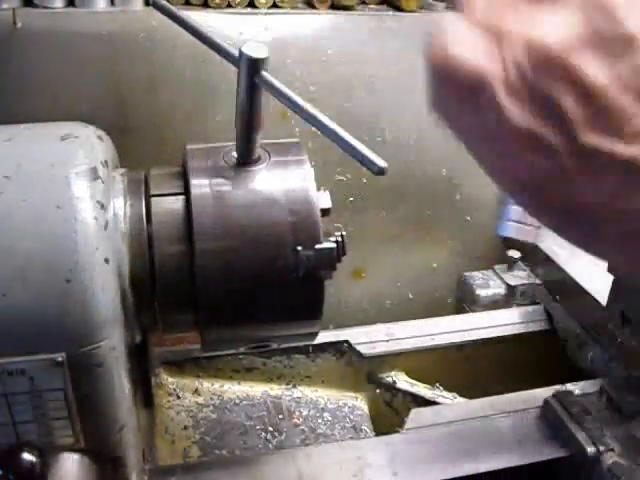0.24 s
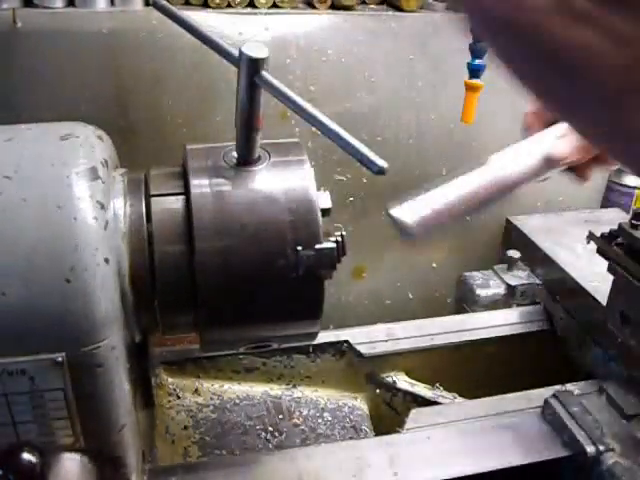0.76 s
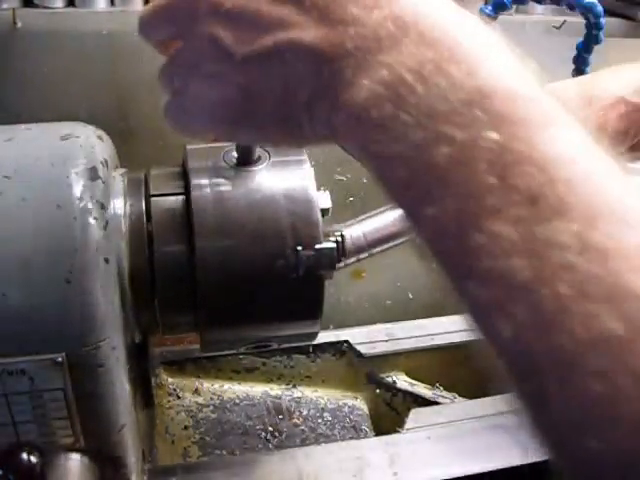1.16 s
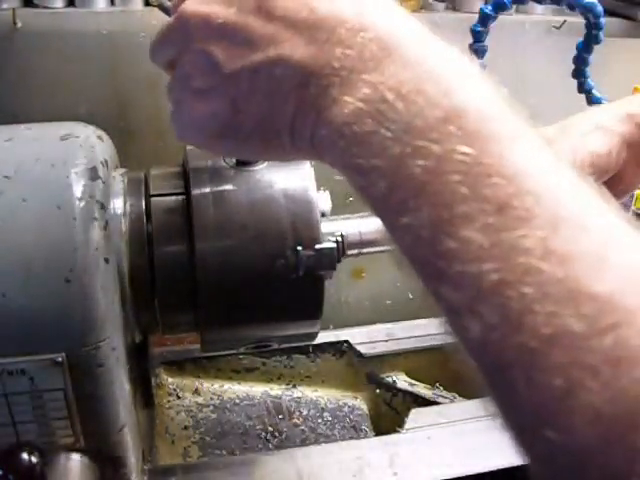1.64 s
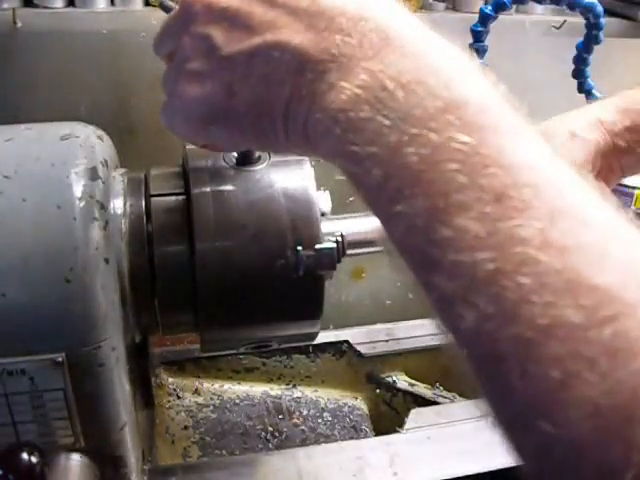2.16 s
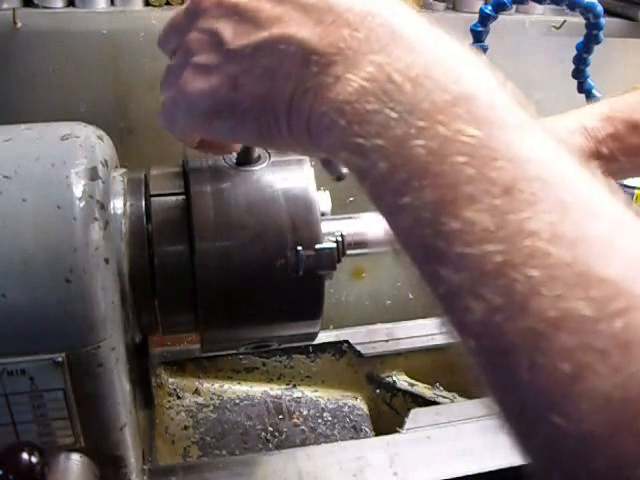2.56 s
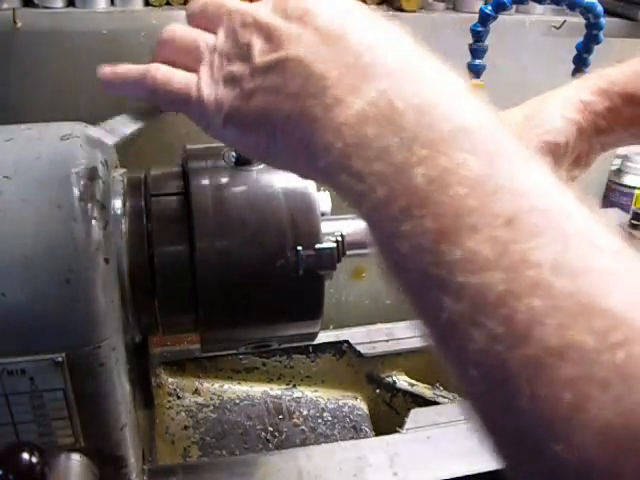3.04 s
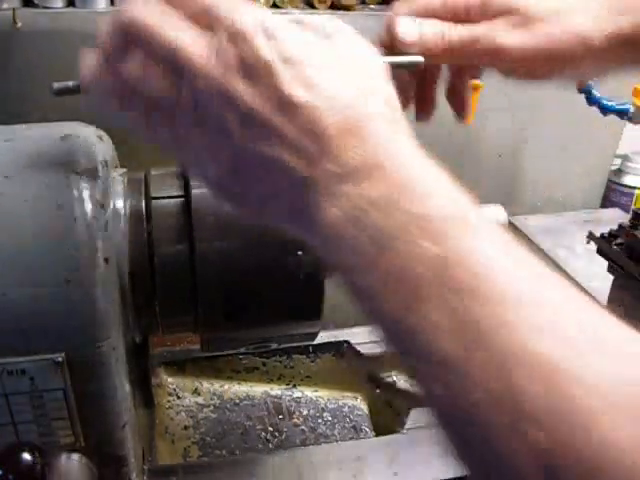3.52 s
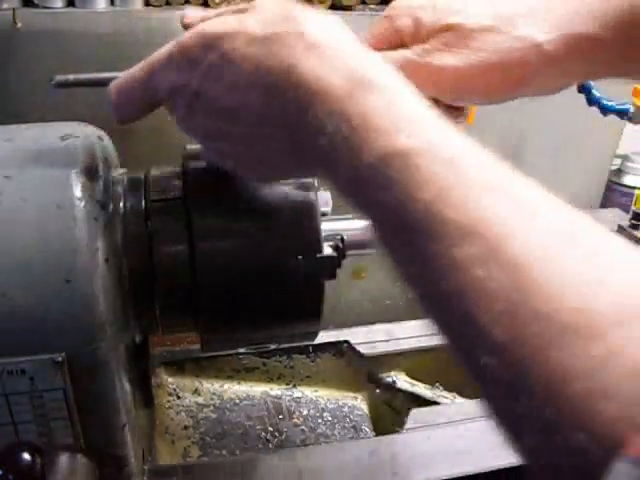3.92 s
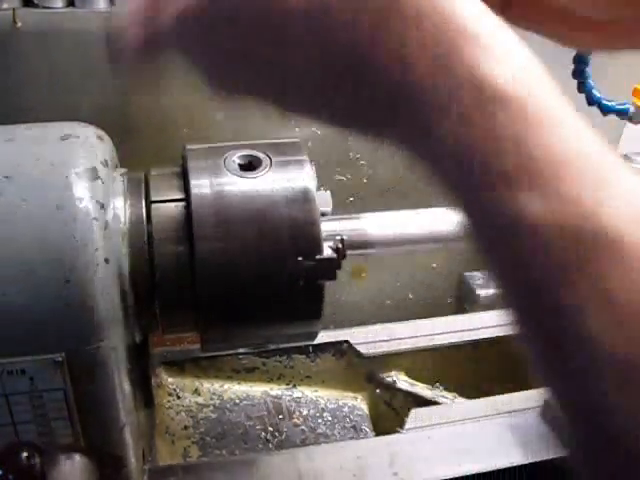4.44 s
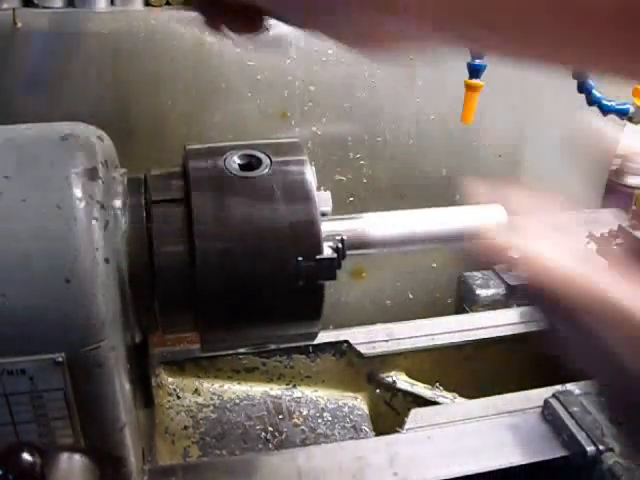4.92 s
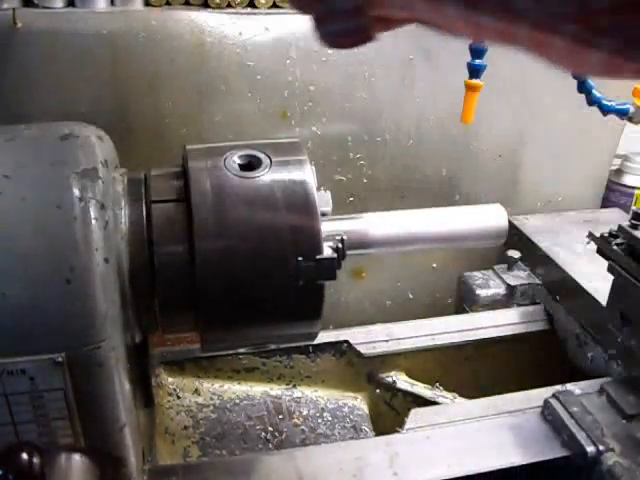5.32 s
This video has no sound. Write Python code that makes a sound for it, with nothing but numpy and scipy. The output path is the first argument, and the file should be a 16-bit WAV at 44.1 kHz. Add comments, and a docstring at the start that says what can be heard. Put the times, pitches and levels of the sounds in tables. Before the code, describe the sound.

Over faint low rumble, thin hiss and a barely audible very high whine, irregular metallic ticks and clinks cluster between one and three seconds as a tube is seated in a chuck. Light scraping fills the gaps. Only a few faint clicks and low bumps follow, then two heavy, clattering steel impacts in quick succession. Close microphone, short room reverberation.

```python
"""A faint low rumble and hiss lie under everything, with two steady, very high tones beating 13 times a second.
A metal tube is fitted into a lathe chuck: each touch excites decaying modes of jaws, chuck and tube.
Between touches random slips make the tube sing and the scroll grind, amid low thumps and one long, faint hum.
At the end the key is put down on a steel tray with a double clunk: tray modes, noise bursts and a bench thud.
Decaying noise gives the lathe sounds their room."""
import sys
import numpy as np
from scipy import signal
from scipy.fft import rfft, irfft
from scipy.io import wavfile

SR = 44100
rng = np.random.default_rng(int(sys.argv[2]) if len(sys.argv) > 2 else 0)


def bounce(signal):
    """Save signal as a 16-bit WAV file at the path given by the first command-line argument."""
    frames = np.transpose(np.atleast_2d(signal))
    limited = np.clip(frames, -1, 1)
    pcm = np.round(limited * 32767).astype(np.int16)
    wavfile.write(sys.argv[1], SR, pcm)


N = 246078
SPAN = int(0.3 * SR)  # samples in one contact sound


def from_db(db):
    """Decibels to gain."""
    return 10 ** (np.asarray(db) / 20)


def rms_one(x):
    """Scale to rms 1."""
    return x / np.sqrt(np.mean(x ** 2) + 1e-20)


def coloured(spectrum, size):
    """Noise shaped by a spectrum drawn over log frequency, rms 1."""
    hz, db = np.transpose(spectrum)
    bins_hz = np.maximum(np.fft.rfftfreq(size, 1 / SR), 1)
    gain = from_db(np.interp(np.log(bins_hz), np.log(hz), db))
    return rms_one(irfft(rfft(rng.standard_normal(size)) * gain, size))


def dying(noise, t60_s):
    """Noise that falls 60 dB in t60_s."""
    return noise * from_db(-60 * np.arange(len(noise)) / SR / t60_s)


def add(out, start_s, sound):
    """Mix a sound in at its start time."""
    i = round(start_s * SR)
    out[i:i + len(sound)] += sound[:N - i]


def contact(chatter_ms, swell_ms):
    """A first click and random chatter that swells, then dies; a longer swell weakens the click. Energy 1."""
    ms = np.arange(SPAN) * 1000 / SR
    envelope = np.exp(-np.abs(ms - swell_ms) / chatter_ms)
    force = 0.2 * rng.standard_normal(SPAN) ** 3 * envelope  # cubing makes it spiky
    force[0] = np.exp(-swell_ms / chatter_ms)
    return force / np.sqrt(np.sum(force ** 2))


def ring(force, hz, t60_s):
    """A two-pole resonator: a unit click sets a decaying sine of height 1 ringing."""
    radius = from_db(-60 / (max(t60_s, 0.005) * SR))
    turn = 2 * np.pi * hz / SR
    feedback = [1, -2 * radius * np.cos(turn), radius ** 2]
    return signal.lfilter([0, np.sin(turn)], feedback, force + 1e-18)


SPLIT, PARTNER = 0.021, 0.23  # relative spread and height of the side modes


def strike(force, hz, t60_s):
    """A mode split into three close ones by loose contact; its energy is that of a unit click on one mode."""
    ratios = 1 + SPLIT * rng.standard_normal(2)
    partners = sum(ring(force, hz * ratio, t60_s * 0.5) for ratio in ratios)
    sound = ring(force, hz, t60_s) + PARTNER * partners
    click_energy = t60_s * SR / (4 * np.log(1000))
    return sound * np.sqrt(click_energy / np.sum(sound ** 2))


def body(force, modes, scatter_db):
    """All modes of a body, each struck with a random strength and sign of its own."""
    sound = 0
    for hz, level_db, t60_s in modes:
        luck, sign = rng.standard_normal(2)
        sound = sound + np.sign(sign) * from_db(level_db + scatter_db * luck) * strike(force, hz, t60_s)
    return sound


def near(modes, spot_hz, fall_db, damping=1):
    """The modes close to the pitch of the spot that is hit speak loudest (fall in dB per octave away)."""
    return [(hz, level_db - fall_db * abs(np.log2(hz / spot_hz)), t60_s * damping)
            for hz, level_db, t60_s in modes]


# tube touching the jaws: start_s, knock_db, knock_hz, low_ring_db, second_ring_db, upper_rings_db,
# grip (0 loose to 1 firm), chatter_ms
TUBE_TOUCHES = [(0.5, -60, 1740, -56, -59, -66, 0.17, 2.5), (1.1363, -48, 1610, -54, -57, -62, .1, 2.2),
                (1.188, -40, 1860, -42.5, -53, -56.5, 0.33, 1.6),
                (1.2486, -44, 1700, -42.5, -54, -60, 0, 2.3), (1.2574, -51, 1650, -43, -49, -58, 0.03, 5.2),
                (1.2656, -41, 1730, -45, -39.5, -58, .15, 4.3),
                (1.2774, -51, 1600, -43, -43.5, -64, 0.23, 2.5), (1.2889, -49, 2860, -48, -50, -64, 0.1, 3),
                (1.3094, -59, 1690, -53, -54, -66, 0.15, 2.5), (1.455, -58, 1600, -54, -48, -64, 0, 2.5),
                (1.4654, -50, 1600, -48, -45, -59, .15, 3.8),
                (1.4816, -23, 3130, -28.5, -31, -38, 0.16, 2.8),
                (1.4937, -18, 3120, -24.5, -18.5, -31, 0.07, 2.8),
                (1.5024, -27.5, 3250, -36, -39, -38, .35, 3.3), (1.559, -29, 2090, -34, -36, -49, .25, 1.9),
                (1.5943, -24.5, 2200, -31.5, -37.5, -39.5, 0.06, .9),
                (1.6093, -25.5, 1830, -34, -37.5, -43.5, 0.37, 1.5),
                (1.6651, -35, 2050, -43, -45, -51, .45, 2.1), (1.6794, -40, 2100, -54, -56, -63, .45, 1.8),
                (1.729, -25, 2460, -33, -45, -51, 0.67, 1.6), (1.9001, -45, 1600, -50, -57, -60, .45, 2.1),
                (1.9165, -35.5, 1900, -44, -53, -61, 0.33, 2.3),
                (1.9375, -36, 2290, -39, -52, -60, 0.26, 2.9),
                (1.9772, -23, 4200, -23.5, -29.5, -54, .1, 2),
                (1.9884, -28, 4230, -26.5, -31, -44, 0.24, 6.1),
                (1.9924, -24.5, 2780, -23.5, -27.5, -43, 0.37, 1.5),
                (2.039, -30.5, 3100, -54, -57, -59, 0.4, 2.1), (2.0514, -43, 2330, -60, -59, -63, .3, 2.8),
                (2.0837, -41, 2130, -39, -57, -61, 0.15, 2.5), (2.1247, -29, 1970, -38, -48, -45, .4, 3.1),
                (2.1382, -29, 2300, -57, -47, -48, 0.82, 2.1), (2.2276, -35.5, 3120, -72, -52, -55, .95, 1),
                (2.3046, -33.5, 1850, -50, -57, -59, .3, 4.8),
                (2.3124, -40, 1920, -55, -53, -62, 0.35, 5.5), (2.358, -40.5, 2730, -55, -53, -67, .7, 1.9),
                (2.402, -30.5, 1980, -42, -43, -49, 0.3, 4.7), (2.4119, -22, 2240, -39, -36, -38, 0.2, 6.6),
                (2.4285, -21.5, 3230, -33, -36, -39, 0.4, 4.1),
                (2.4338, -19.5, 3850, -21, -31, -28, 0.28, 2.4),
                (2.4392, -16, 3340, -21.5, -26, -37, 0.44, 1.9),
                (2.4473, -19, 2500, -48, -43, -45, .6, 1.5), (2.4942, -25, 2360, -42, -43, -46.5, 0.3, 2.1),
                (2.5568, -35.5, 2130, -60, -65, -54, .2, 3.1),
                (2.5914, -39, 2140, -46, -53, -60, 0.26, 3.8), (2.6214, -29, 3120, -44, -64, -66, 0.3, 2.9),
                (2.6259, -22.5, 2220, -36.5, -63, -50.5, 0.19, 1.6),
                (2.6835, -38, 2040, -45, -53, -62, 0.05, 6.4), (2.7044, -48, 2120, -49, -52, -66, .2, 3.2),
                (2.7352, -47, 3190, -55, -59, -66, .3, 1.9), (2.7561, -29.5, 2120, -55, -53, -64, .2, 1.9),
                (2.7724, -35.5, 2570, -45, -59, -58, 0.37, 3.6),
                (2.7901, -37, 2260, -57, -69, -67, .25, 2.3), (2.833, -31.5, 2120, -48, -66, -59, 0.3, 1.2),
                (2.8804, -40, 2460, -55, -60, -66, 0.2, 2.3),
                (2.89, -29.5, 2170, -36.5, -46.5, -62, 0.2, 2.2),
                (2.9753, -25.5, 2230, -36, -42.5, -56, 0.32, 2.2),
                (3.0909, -37.5, 1910, -55, -71, -69, 0.36, 2.9),
                (3.7005, -37.5, 4350, -58, -69, -66, .6, 1.6), (4.3141, -41, 2420, -60, -71, -64, .7, 4.1)]
# jaw modes: pitch_hz, level_db, t60_s
JAW_MODES = [(1763, -5.5, 0.043), (1900, 2, 0.025), (2142, -6.5, 0.039), (2310, -18, 0.024),
             (2750, -15.5, 0.019), (3120, 0, 0.029), (3160, -11, 0.038), (3590, -1, 0.011),
             (3900, -12, 0.022), (4160, -3, 0.017), (4630, -22, 0.021), (5260, -2, 0.026),
             (6150, -28, 0.022), (6760, -19, 0.024)]
# chuck body modes: pitch_hz, level_db, t60_s
CHUCK_MODES = [(636, -11, 0.054), (805, -6.5, 0.038), (980, -2, 0.024), (1150, -8, 0.015),
               (1323, -14, 0.023)]
# upper tube modes before grip damps them: pitch_hz, level_db, t60_s
TUBE_UPPER_MODES = [(8920, -4, 0.14), (9750, -5.5, 0.087), (10090, -2, 0.13), (11000, -1.5, .04),
                    (11270, -4, 0.12), (12940, 2.5, 0.11), (14100, -34, 0.034)]
# the many small modes of the chuck: pitch_hz, level_db (per Hz)
RATTLE_SPECTRUM = [(300, -14), (600, -16), (1000, -4.5), (1500, -4.5), (2200, 5.5), (3200, 1), (4500, -6.5),
                   (7000, -17.5), (12000, -25)]
# short bright tick: pitch_hz, level_db (per Hz)
TICK_SPECTRUM = [(3000, -15), (6500, -6), (8500, 9), (11000, -5), (14000, -9), (16000, -18)]
RATTLE_DB, RATTLE_T60_S, RATTLE_TAIL_DB, RATTLE_TAIL_T60_S = -9, 0.025, -24.5, 0.12
SWELL_MS, TICK_DB, TICK_T60_S = 0.65, -5, 0.1  # tick level is against the upper rings
JAWS_DB, JAWS_FALL_DB, UPPER_FALL_DB = -9.5, 22.5, 21  # falls per octave away
# a firmer grip of the jaws raises and damps the tube rings: (loose, firm)
LOW_RING_HZ, SECOND_RING_HZ, RING_T60_S = (4960, 5480), (7560, 8550), (0.073, 0.017)
FREE_T60_S = 0.1  # ring time at which the upper modes keep their own decay
UPPER_SPOT_HZ = (9500, 11800)  # range of the favoured upper pitch
# as the jaws close the chuck body falls quiet: (open, closed)
CLOSING_S, CHUCK_DB = (1.3, 3.05), (-19.5, -43)
CHUCK_FOLLOWS = 0.56  # share of the knock's level in dB


def touches():
    """Each touch knocks the jaws and chuck, rings the tube and gives a short bright tick."""
    out = np.zeros(N)
    for start_s, knock_db, knock_hz, low_db, second_db, upper_db, grip, chatter_ms in TUBE_TOUCHES:
        low_hz = np.interp(grip, [0, 1], LOW_RING_HZ)
        second_hz = np.interp(grip, [0, 1], SECOND_RING_HZ)
        ring_t60_s = np.interp(grip, [0, 1], RING_T60_S)
        force = contact(chatter_ms, SWELL_MS)

        rattle = from_db(RATTLE_DB) * dying(coloured(RATTLE_SPECTRUM, SPAN), RATTLE_T60_S)
        rattle += from_db(RATTLE_TAIL_DB) * dying(coloured(RATTLE_SPECTRUM, SPAN), RATTLE_TAIL_T60_S)
        tick = from_db(upper_db + TICK_DB) * dying(coloured(TICK_SPECTRUM, SPAN), TICK_T60_S)
        sound = signal.fftconvolve(force, from_db(knock_db) * rattle + tick)[:SPAN]

        jaws = near(JAW_MODES, knock_hz, JAWS_FALL_DB)
        sound += from_db(knock_db + JAWS_DB) * body(force, jaws, scatter_db=0)
        chuck_db = np.interp(start_s, CLOSING_S, CHUCK_DB) + CHUCK_FOLLOWS * knock_db
        sound += from_db(chuck_db) * body(force, CHUCK_MODES, scatter_db=0.5)

        sound += from_db(low_db) * strike(force, low_hz, ring_t60_s)
        sound += from_db(second_db) * strike(force, second_hz, ring_t60_s)
        spot_hz = rng.uniform(*UPPER_SPOT_HZ)
        upper = near(TUBE_UPPER_MODES, spot_hz, UPPER_FALL_DB, damping=ring_t60_s / FREE_T60_S)
        sound += from_db(upper_db) * body(force, upper, scatter_db=3)
        add(out, start_s, sound)
    return out


# tube sliding on the jaws: time_s, tube_singing_db, scroll_grind_db, low_scrape_db
SLIDE_LEVELS = [(1.05, -75, -78, -70), (1.23, -72, -69, -55.5), (1.36, -78, -80, -63),
                (1.55, -63, -71, -61), (1.74, -84, -76, -52), (1.95, -68, -71, -61.5),
                (2.08, -66, -67, -51), (2.38, -82, -69, -62.5), (2.55, -58, -65, -54),
                (2.63, -69, -65, -55.5), (2.71, -58, -68, -54), (2.87, -77, -71, -59), (3.1, -78, -76, -59),
                (3.5, -82, -85, -70), (3.74, -86, -72, -54.5), (4.1, -84, -79, -76)]
# tube modes that sing while it slides: pitch_hz, level_db, t60_s
SINGING_MODES = [(5100, -2.5, 0.079), (7630, -2.5, 0.051)]


def slide():
    """Dense tiny slips keep tube and jaw modes faintly ringing; band-limited noise is the low scrape."""
    time_s, *columns = np.transpose(SLIDE_LEVELS)
    t = np.arange(N) / SR
    singing, grind, scrape = [from_db(np.interp(t, time_s, column, -120, -120)) for column in columns]

    # slips come in bunches: their rate wanders around 600 per second
    wander = np.interp(np.arange(N), np.linspace(0, N, 300), rng.standard_normal(300))
    chance = 600 / SR * from_db(6.0 * wander)
    slips = rng.standard_normal(N) * (rng.random(N) < chance)

    sung = sum(from_db(level_db) * rms_one(ring(slips, hz, t60_s)) for hz, level_db, t60_s in SINGING_MODES)
    ground = rms_one(body(slips, JAW_MODES, scatter_db=0))
    low_band = signal.butter(2, [150, 480], "band", fs=SR, output="sos")
    scraped = rms_one(signal.sosfilt(low_band, rng.standard_normal(N)))
    return singing * sung + grind * ground + scrape * scraped


# key put down: start_s, level_db, chatter_ms, bench_thud_db, free_ringing_ms
KEY_LANDINGS = [(5.3435, -8, 3.8, -36, 17), (5.4117, -9, 2.6, -28.5, 6.4)]
# key and steel tray modes: pitch_hz, first_landing_db, second_landing_db, t60_s
TRAY_MODES = [(275, -17, -14.5, 0.19), (476, -33, -17.5, 0.19), (1046, -13, -31, 0.11),
              (1090, -12.5, -13, 0.077), (1350, -3, -32, 0.042), (1510, -11, -17, 0.03),
              (1740, 6, -3, 0.038), (1810, -6, 2, 0.034), (1894, 0.5, 2, 0.021), (2350, -27, 1, 0.03),
              (2660, -27, -27, 0.092), (2810, -10, -20, 0.22), (2923, -8, -4, 0.052), (3180, -16, 2, 0.044),
              (3360, -16, -4.5, 0.06), (4160, -14, -23, 0.056), (4480, -9, -12, 0.043),
              (4900, -4, 0, 0.023), (5120, -26, 1.5, 0.021), (5390, -5.5, -10, 0.035),
              (6050, -10, -14, .04), (6680, -8, -25, 0.03)]
# crack and clattering tail: pitch_hz, level_db (per Hz)
CLATTER_SPECTRUM = [(400, -20), (700, -17), (1200, -12), (1770, -4), (2630, 3), (3280, -2), (3940, -8),
                    (4990, -6), (7110, -12), (16000, -18.5)]
CRACK_DB, CRACK_T60_S, CLATTER_DB, CLATTER_T60_S = -7, 0.055, -26.5, 0.3
REST_DB, REST_MS = -4, 1.6  # the key comes to rest on the tray and damps it
THUD_BAND_HZ, THUD_RISE_S, THUD_T60_S = [215, 580], 0.0089, 0.24


def clunks():
    """The key lands twice: tray modes, a crack, a clattering tail and the slower thud of the bench."""
    out, t = np.zeros(N), np.arange(SPAN) / SR
    bench = signal.butter(2, THUD_BAND_HZ, "band", fs=SR, output="sos")
    for landing, (start_s, level_db, chatter_ms, thud_db, free_ms) in enumerate(KEY_LANDINGS):
        modes = [(hz, (first_db, second_db)[landing], t60_s) for hz, first_db, second_db, t60_s in TRAY_MODES]
        sound = from_db(-6.5) * body(contact(chatter_ms, swell_ms=1.3), modes, scatter_db=1.0)
        sound += from_db(CRACK_DB) * dying(coloured(CLATTER_SPECTRUM, SPAN), CRACK_T60_S)
        sound *= from_db(REST_DB * np.clip((1000 * t - free_ms) / REST_MS, 0, 1))
        sound += from_db(CLATTER_DB) * dying(coloured(CLATTER_SPECTRUM, SPAN), CLATTER_T60_S)

        rise = 1 - np.exp(-(t / THUD_RISE_S) ** 2)
        thud = rms_one(signal.sosfilt(bench, rng.standard_normal(SPAN))) * rise
        add(out, start_s, from_db(level_db) * sound + from_db(thud_db) * dying(thud, THUD_T60_S))
    return out


# low thumps, and one long, faint hum at 368 Hz (first row) that dies away: start_s, pitch_hz, level_db, t60_s
THUMPS_AND_HUM = [(1.14, 368, -47.5, 1.4), (2.0, 305, -41, .25), (2.545, 290, -42, .25),
                  (3.77, 205, -39, .2), (1.65, 290, -46, .2), (2.04, 180, -42, .25), (2.41, 300, -46, .2),
                  (3.70, 310, -46, .15), (3.75, 400, -47, .12), (4.67, 55, -38, .3)]


def thumps_and_hum():
    """Each row is one low mode set going by a soft push; the hum's mode decays far more slowly."""
    out = np.zeros(N)
    push = np.pad(np.hanning(60) / 30, (0, 3 * SPAN))  # a push of 60 samples, then room to ring
    for start_s, hz, level_db, t60_s in THUMPS_AND_HUM:
        add(out, start_s, from_db(level_db) * ring(push, hz, t60_s))
    return out


ROOM_DB, ROOM_T60_S, ROOM_TREBLE_T60_S, WALL_CUT_HZ, ROOM_GAP_S = -12.5, 0.27, 0.15, 2840, 0.006


def workshop(x):
    """Dense echoes off walls and machines: dying noise after a short gap, the treble dying first."""
    noise = rng.standard_normal((2, SPAN))
    dull = signal.sosfilt(signal.butter(2, WALL_CUT_HZ, fs=SR, output="sos"), noise[0])
    echoes = dying(dull, ROOM_T60_S) + dying(noise[1], ROOM_TREBLE_T60_S)
    echoes /= np.sqrt(np.sum(echoes ** 2))
    echoes = np.pad(echoes, (int(ROOM_GAP_S * SR), 0))
    return from_db(ROOM_DB) * signal.fftconvolve(x, echoes)[:N]


# low rumble and hiss: pitch_hz, level_db (per Hz)
FLOOR_SPECTRUM = [(9, -31), (15, -0.5), (43, -4), (188, -12.5), (423, -19.5), (518, -22.5), (900, -26.5),
                  (1920, -33.5), (4500, -38), (11600, -41.5), (15100, -42.5), (15600, -34), (15800, -42),
                  (16000, -66)]


def rumble_and_hiss():
    """Steady noise, strongest in the deep bass and thinning out into a hiss."""
    return from_db(-47) * coloured(FLOOR_SPECTRUM, N)


TONE_HZ, BEAT_HZ, BEAT_PEAK_S = 15734.3, 13.0, 0.035  # the two tones line up at the peak
TONE_DB, SECOND_TONE_DB = -63, -4  # second tone against the first


def high_tones():
    """Two steady, very high tones close together, beating 13 times a second."""
    turn = 2 * np.pi * (np.arange(N) / SR - BEAT_PEAK_S)
    first = np.sin(TONE_HZ * turn)
    second = from_db(SECOND_TONE_DB) * np.sin((TONE_HZ + BEAT_HZ) * turn)
    return from_db(TONE_DB) * np.sqrt(2) * (first + second)


def scene():
    """Lathe sounds with their room, over the steady background."""
    lathe = touches() + slide() + clunks() + thumps_and_hum()
    background = rumble_and_hiss() + high_tones()
    return (lathe + workshop(lathe) + background)[None]


TOP, CUTOFF_HZ = 0.75, 17150  # ceiling of the rounding; edge above which all is 75 dB down


def record(dry):
    """The loudest peaks are rounded, then the extreme treble is cut steeply."""
    rounded = TOP * np.tanh(dry / TOP)
    cut = signal.cheby2(16, 75, CUTOFF_HZ, fs=SR, output="sos")
    return signal.sosfilt(cut, rounded)


dry = scene()
out = record(dry)
bounce(out)
```